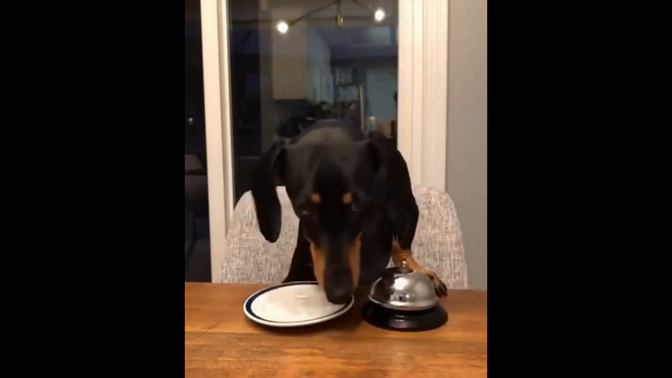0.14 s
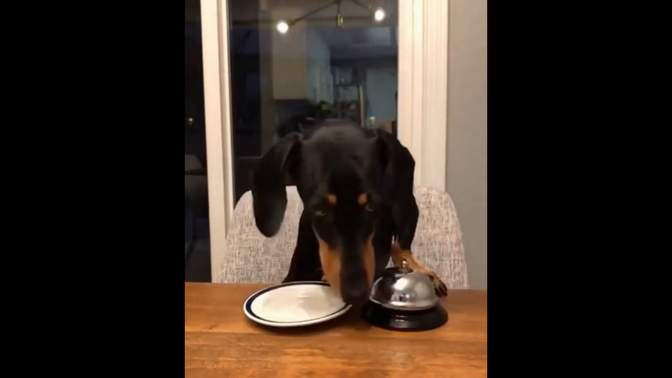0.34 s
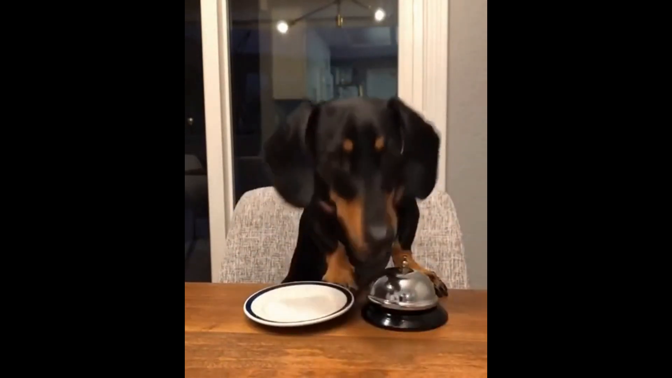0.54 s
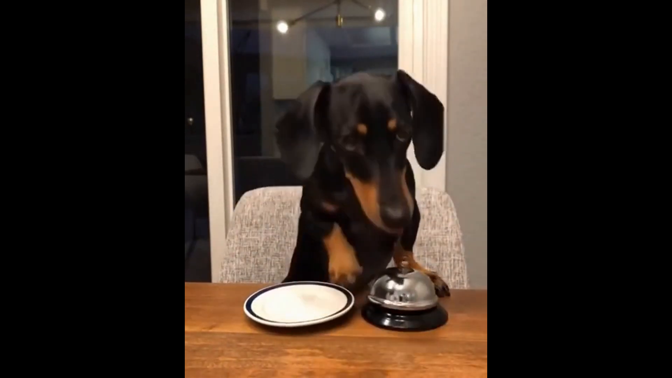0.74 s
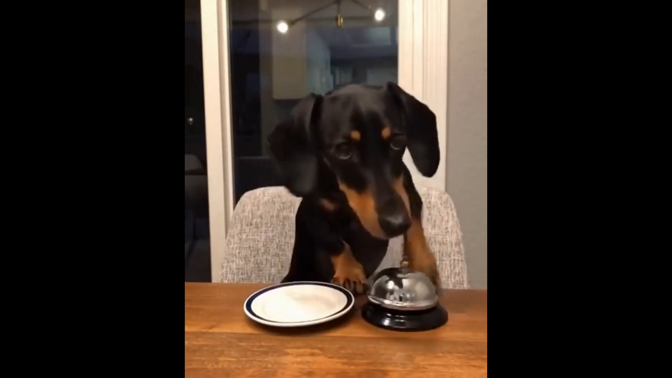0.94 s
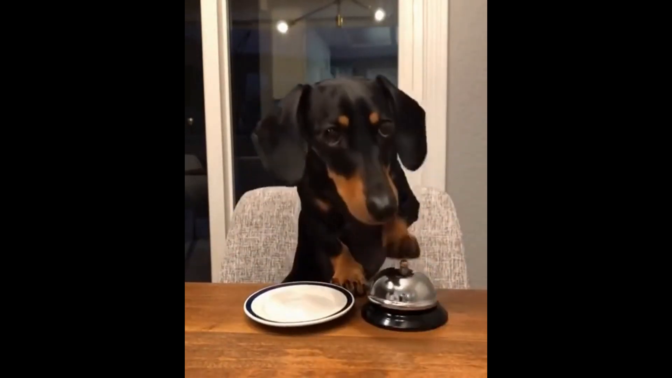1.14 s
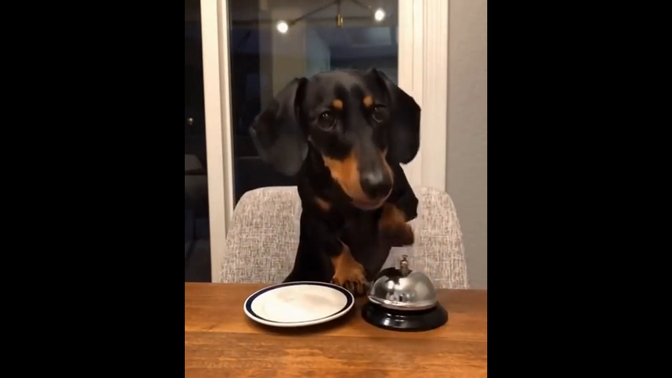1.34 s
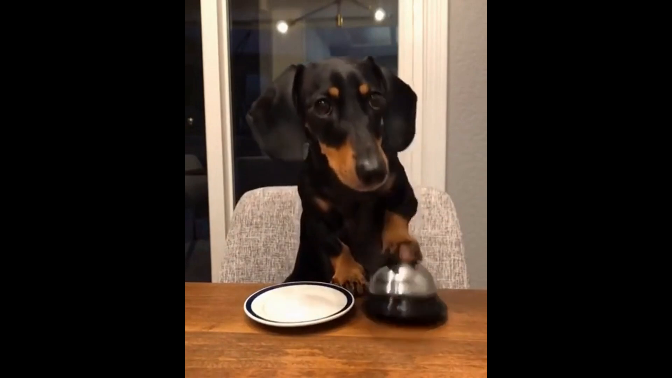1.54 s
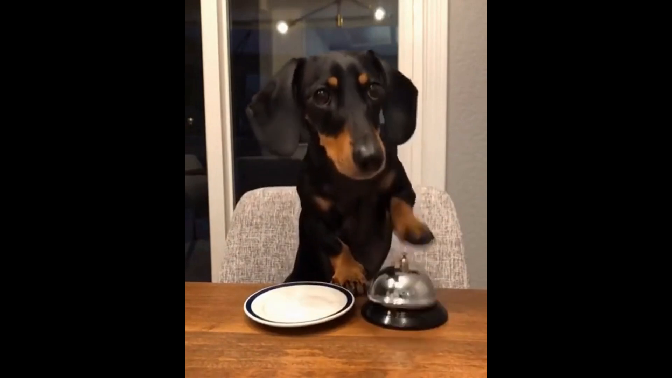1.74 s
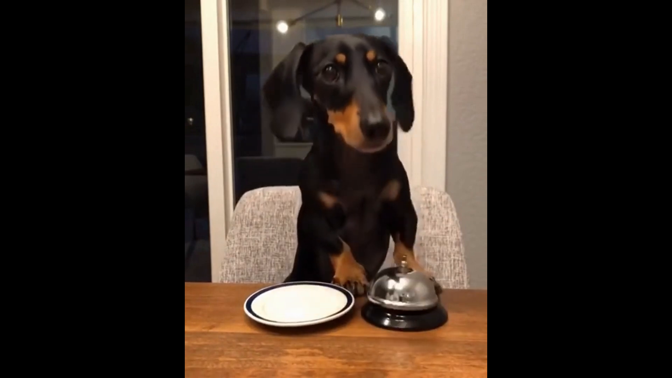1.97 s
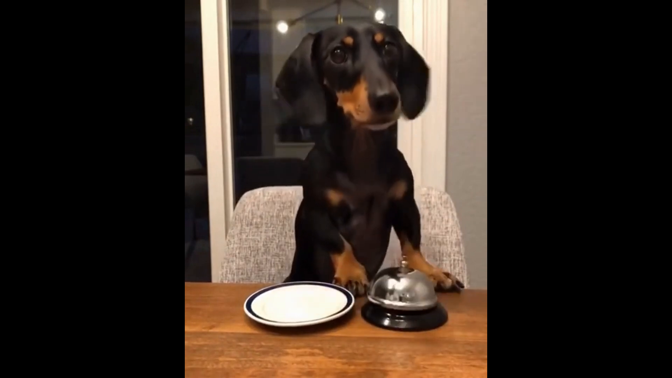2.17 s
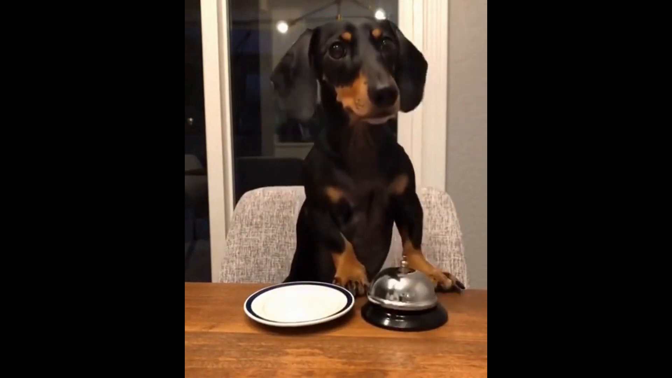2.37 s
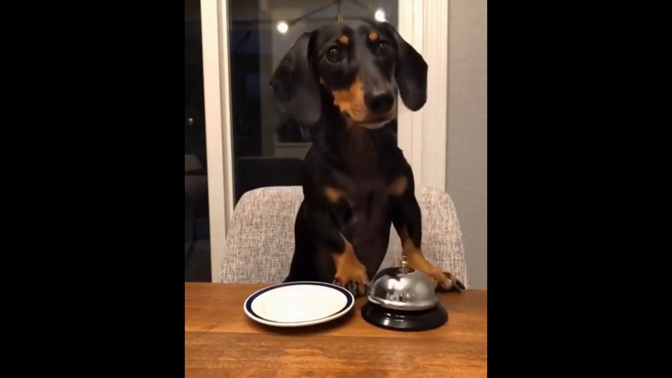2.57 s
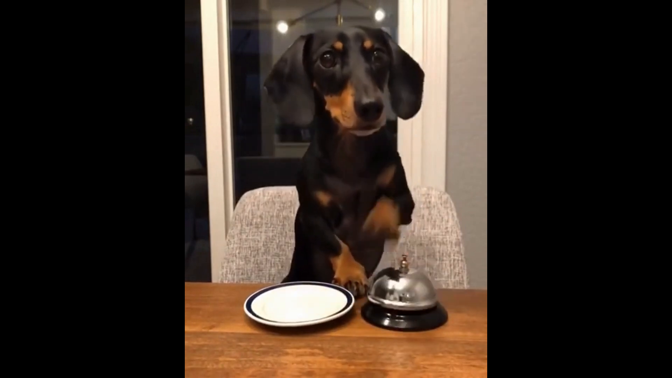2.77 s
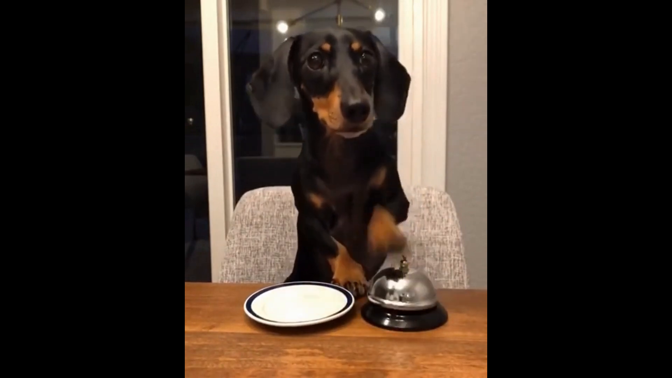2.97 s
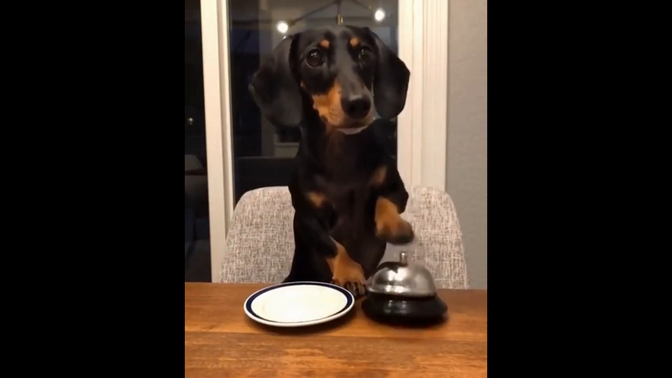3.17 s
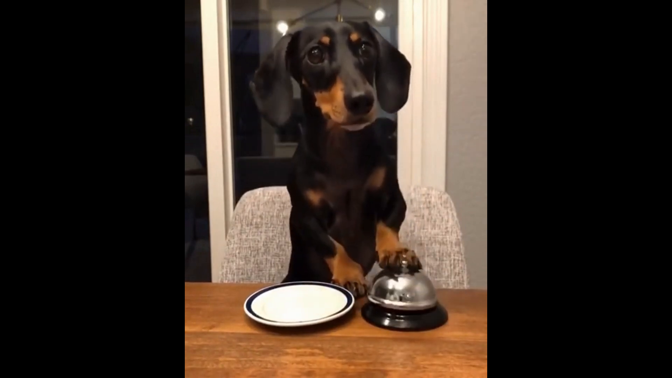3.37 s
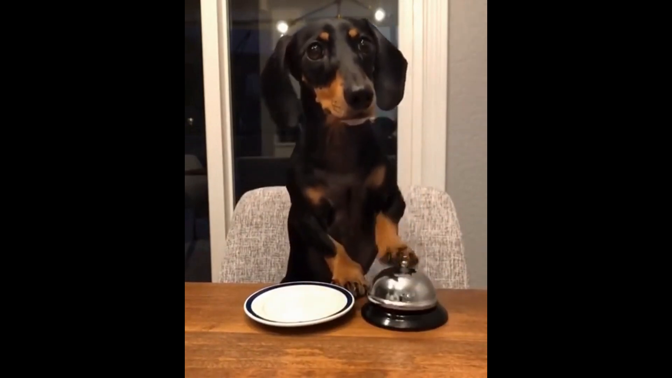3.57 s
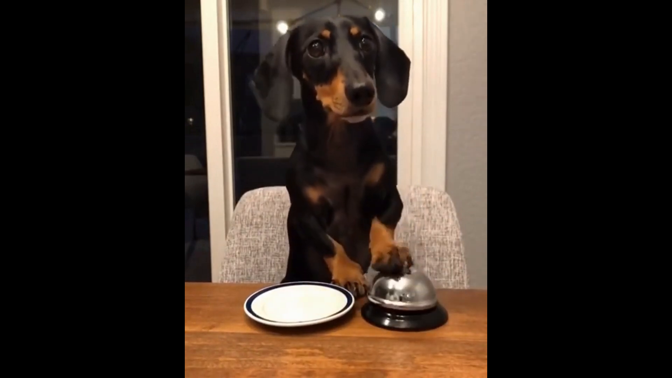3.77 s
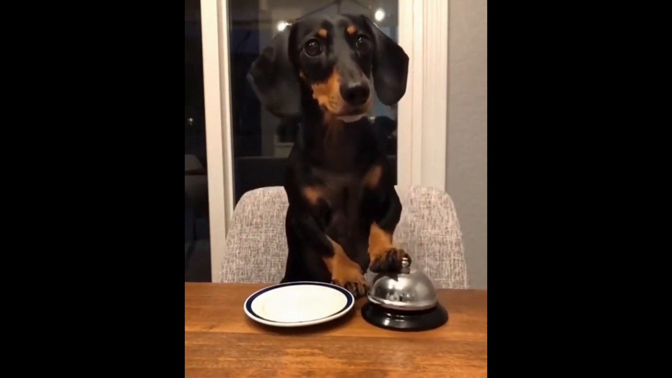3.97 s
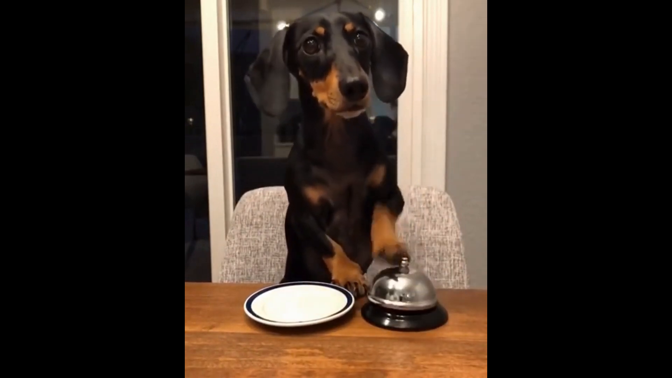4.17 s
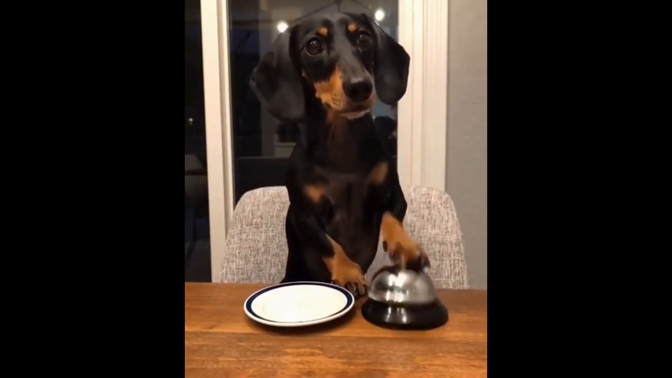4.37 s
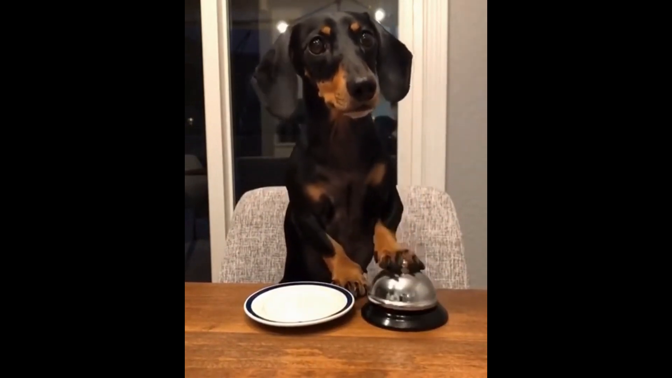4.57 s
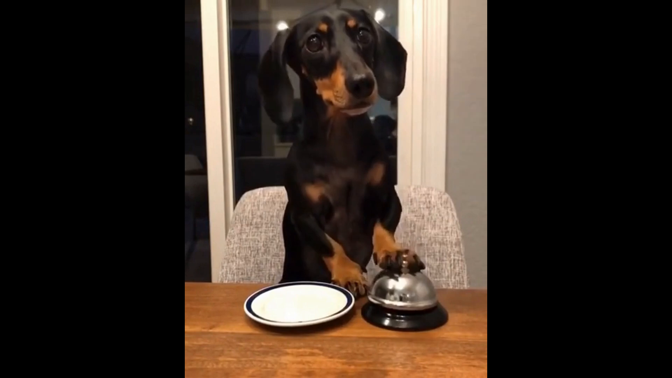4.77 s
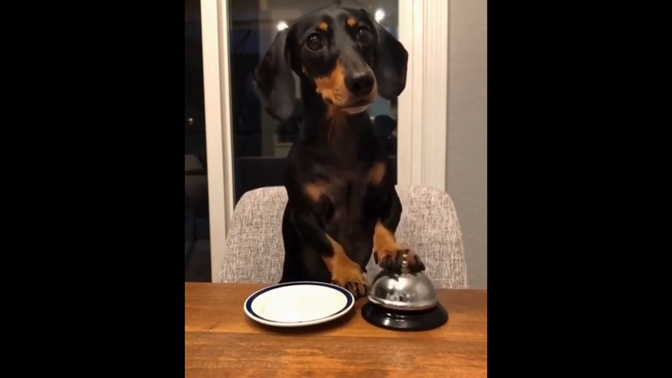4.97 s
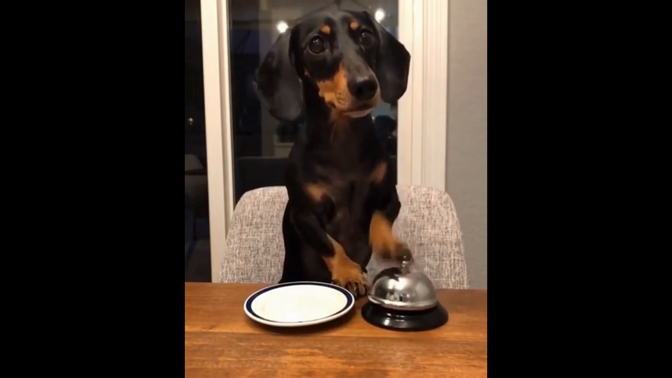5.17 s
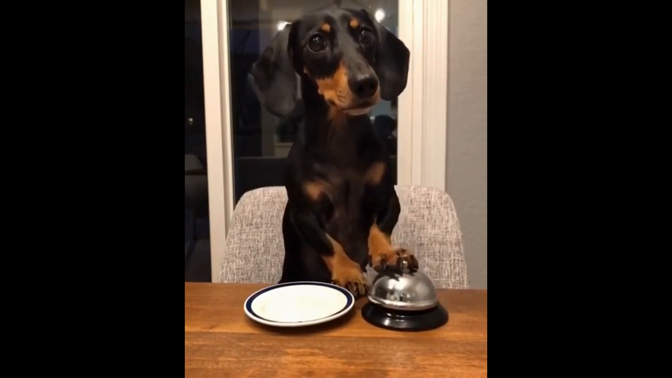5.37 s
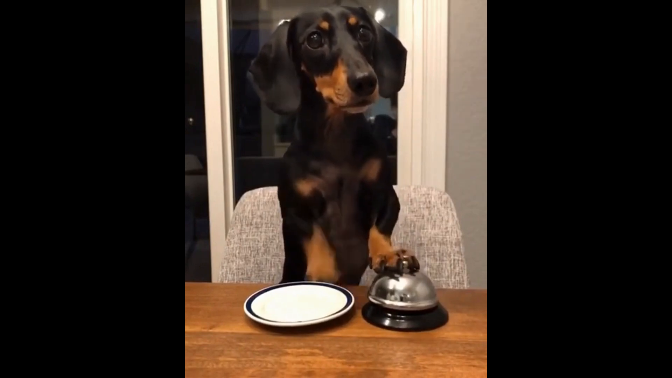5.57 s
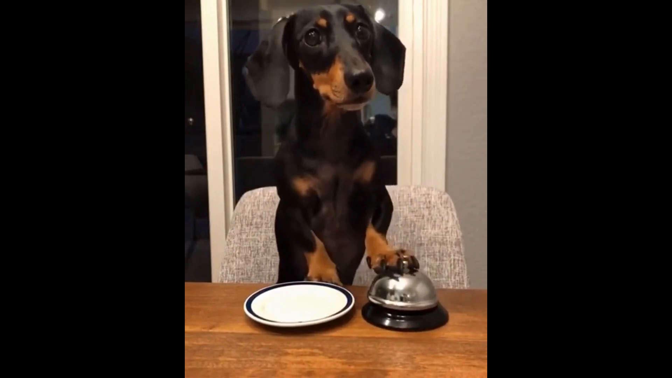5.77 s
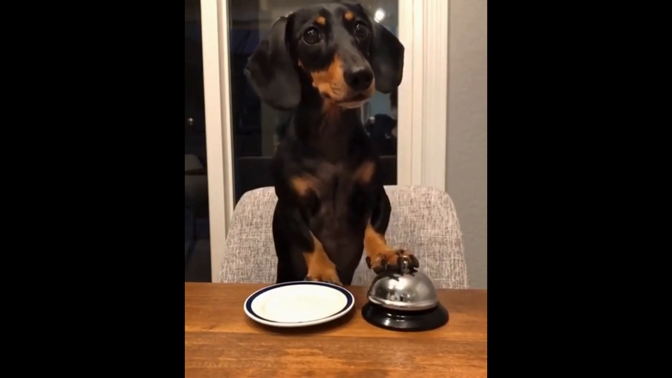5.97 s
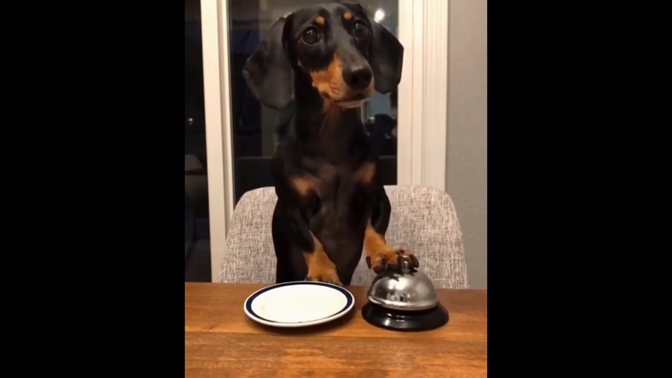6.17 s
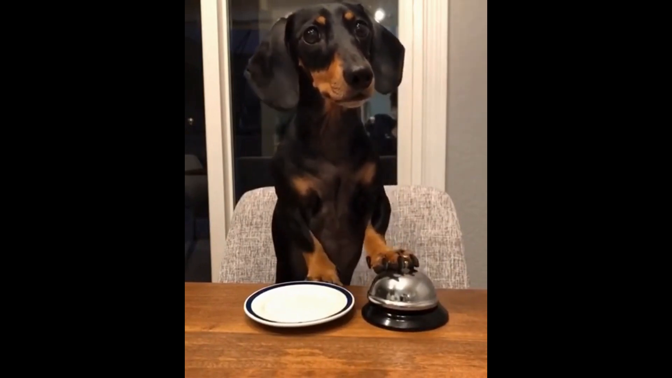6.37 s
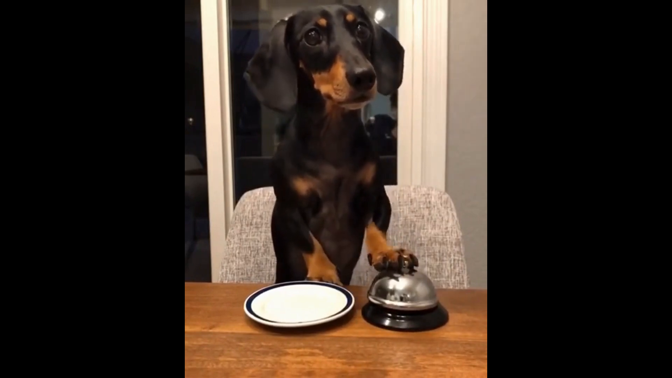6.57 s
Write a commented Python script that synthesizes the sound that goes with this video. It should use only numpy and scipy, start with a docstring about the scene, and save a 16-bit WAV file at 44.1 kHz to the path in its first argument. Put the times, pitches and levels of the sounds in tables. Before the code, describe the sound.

Soft licks and claw ticks, then a desk bell dings three times amid clacks and thumps on a wooden table in a quiet room.

```python
"""Dog at a desk bell

A quiet room, one mono microphone close to a steel desk bell on a wooden table. A dog licks a plate,
then paws the bell: the striker rings the dome, the paw damps it, slips off and thumps the table.
Claws tick, fur scuffs and the base rattles. A limiter holds the loud blows down."""
import sys
import numpy as np
from scipy import signal
from scipy.fft import rfft, irfft, next_fast_len
from scipy.io import wavfile
from scipy.ndimage import uniform_filter1d

SR = 44100
rng = np.random.default_rng(int(sys.argv[2]) if len(sys.argv) > 2 else 0)


def output_pcm(signal):
    """Save a mono or channel-first signal as 16-bit PCM at the path in sys.argv[1].

    Samples are clipped to [-1, 1] before scaling.
    """
    pcm = np.clip(np.atleast_2d(signal).T, -1, 1) * 32767
    wavfile.write(sys.argv[1], SR, np.round(pcm).astype(np.int16))


N = 291942
T = np.arange(N) / SR

# colour of the room's air: (frequency [Hz], level [dB])
AIR_COLOUR = [(13, -43), (22, -13), (79, -14), (135, -11), (190, 1), (324, -16), (435, -9), (552, -16),
              (702, -9), (1130, -25), (1560, -27), (1740, -23), (3200, -37), (11200, -51), (12800, -67),
              (16600, -97), (22000, -120)]
# the air at the microphone: (time [s], level [dB])
AIR_CURVE = [(0, -50), (.8, -52), (2.5, -54), (6.62, -53)]
# wavering hums: (frequency [Hz], width [Hz], level [dB])
ROOM_HUMS = [(42, 10, -69), (118, 10, -70), (193, 5, -59), (250, 12, -66), (432, 15, -68), (710, 30, -68)]
# colour of the reflections: (frequency [Hz], level [dB])
ROOM_COLOUR = [(20, -36), (60, -16), (150, -10), (250, -6), (400, -10), (700, -15), (1300, -7), (1900, -10),
               (2800, -10), (5000, -15), (6500, -15), (8500, -23), (12300, -19), (20000, -40)]
# decay of the reflections: (frequency [Hz], t60 [s])
ROOM_DECAY = [(60, .45), (250, .45), (700, .65), (1500, .62), (3500, .52), (7000, .42), (12000, .3)]

# deep rumble: (loudest at [s], level [dB], 20 dB rise [s], 20 dB fall [s])
RUMBLE_SWELLS = [(.8, -49, .15, .3), (1.42, -51, .2, .4), (3.0, -48, .18, .3), (4.3, -51, .22, .3)]
# scuffs, except at 3.116 and 4.372 s, where a short noise swell rises just before a slam:
# (loudest at [s], level [dB], 20 dB rise [s], 20 dB fall [s])
NOISE_SWELLS = [(.106, -47, .08, .05), (.178, -52, .05, .09), (.37, -64, .12, .07), (.584, -66, .25, .3),
                (.706, -50, .012, .11), (.94, -67, .1, .2), (1.176, -45, .045, .11),
                (1.306, -45, .015, .025), (1.402, -44, .03, .05), (1.594, -52, .17, .005),
                (2.826, -70, .11, .08), (2.908, -45, .022, .03), (2.922, -35, .008, .003),
                (3.116, -21, .025, .003), (3.62, -26, .02, .015), (3.655, -38, .04, .08),
                (4.198, -38, .025, .08), (4.26, -39, .08, .06), (4.372, -26, .03, .003),
                (5.082, -50, .07, .11), (5.24, -68, .1, .25), (6.478, -63, .01, .4), (6.604, -54, .03, .08)]
# colour of that noise: (frequency [Hz], level [dB])
NOISE_COLOUR = [(300, -20), (700, -8), (1300, -2), (1800, -1.5), (2350, -6), (3500, -5), (4650, -8),
                (5900, -13), (7600, -10), (9200, -8), (11800, -12), (14000, -30)]
# flares of high hiss: (loudest at [s], level [dB], 20 dB rise [s], 20 dB fall [s])
HISS_SWELLS = [(3.265, -23, .07, .1), (3.44, -57, .1, .12)]
# tongue on the plate: (time [s], level [dB], pitch [Hz])
TONGUE_LICKS = [(0.0513, -31, 1460), (0.0697, -23, 1180), (0.0797, -23, 1130), (0.0974, -27, 1490),
                (0.1054, -26, 1020), (0.1456, -37, 1130), (0.181, -31, 1460), (0.2144, -41, 1310),
                (0.3331, -34, 1460), (0.5297, -40, 1500), (0.5796, -41, 1380)]
# claw ticks: (time [s], level [dB], pitch [Hz])
CLAW_TICKS = [(.043, -40, 3500), (.102, -32, 3400), (.216, -40, 3200), (.385, -50, 3400),
              (.7154, -31, 1500), (1.1697, -30, 8940), (1.18, -36, 4700), (1.1962, -34, 1300),
              (1.3024, -33, 6970), (1.32, -42, 3400), (1.3992, -31, 2700), (1.4, -34, 7800),
              (1.41, -33, 3700), (1.5135, -41, 2910), (1.5728, -32, 2740), (2.908, -32, 4300),
              (4.1924, -32, 1400), (5.085, -36, 4500), (5.4335, -35, 6000), (5.524, -41, 1800),
              (6.4787, -42, 5500), (6.5435, -47, 4460), (6.6044, -35, 1490)]
TICK_CYCLES, TICK_MIN_T60_S, TICK_SPREAD_OCT = 13, .012, .5
# a small metal clink: (time [s], level [dB])
CLINK_HIT = [(5.4335, -34)]
# its modes: (frequency [Hz], level [dB], t60 [s])
METAL_MODES = [(2256, -25, .3), (4807, -19.5, .65), (4883, -6, .11), (4960, -12, .12), (5545, -19, .3),
               (5642, -18, .3), (7585, -18, .2), (7854, -11, .22), (7892, -12, .25), (8382, -6, .08),
               (8839, -16, .25), (11010, -16, .22), (11300, -13, .1), (11590, -15, .14)]

# table top modes: (frequency [Hz], level [dB], t60 [s])
WOOD_MODES = [(43, -27.5, 1.1), (80, -20, .3), (117, -10, .22), (155, -1.5, .19), (195, -12, .2),
              (236, -8, .36), (300, -2.5, .27), (366, -17, .35), (460, -12, .33), (495, -18, .3),
              (630, -23, .3), (797, -17, .28)]
PUSH_S, DEEP_HZ, SPOT_DB = .012, 200, 2.5
# hard modes of the bell base: (frequency [Hz], level [dB], t60 [s])
BASE_MODES = [(1330, 2.5, .018), (2800, .1, .015), (3700, -9, .012), (4700, -8, .012), (6100, -5, .012),
              (8700, -11, .01), (11300, -14, .01), (12700, -5, .02)]
RATTLE_PER_S, RATTLE_S, RATTLE_DB = 150, .04, -8.5
# soft paw steps: (time [s], crack [dB], wood [dB], room send [dB], deepest modes [dB])
PAW_STEPS = [(.7053, -33, -40, -25, 6), (1.165, -48, -42, -17, -6), (2.725, -58, -39, -17, -4),
             (5.0894, -45, -34, -17, -10), (5.5223, -45, -43, -18, -8)]
# the paw slams the base down: (time [s], crack [dB], wood [dB], bounce after [s], second after [s])
BASE_SLAMS = [(1.6057, -8, -9, .0474, .0608), (3.1203, -9, -11, .0319, .0471),
              (4.376, -9.5, -11.5, .025, .045)]
# the plunger bottoms out: (time [s], crack [dB], wood [dB], springs back after [s])
PLUNGER_HITS = [(2.9262, -23, -31, .0332), (3.6172, -25, -34, .0414), (4.2044, -26, -36, .0394)]

# the paw's weight near the dome: (time [s], damping [dB/s])
PAW_LEAN = [(0, .1), (2.88, .1), (2.93, 10), (4.0, 11), (4.5, 19), (5.0, 21), (5.4, 28), (5.44, 110),
            (6.62, 110)]
# the paw closes on the dome: (start [s], length [s], damping [dB/s])
PAW_GRIPS = [(1.39, .24, 55), (3.11, .05, 30), (3.183, .016, 1300)]
PRESS_S, PRESS_DB_S = .05, 45
# dome modes, close twins beat: (frequency [Hz], free t60 [s], share of paw damping, starting sign,
# share of twin balance, struck [dB], jolted [dB])
DOME_MODES = [(940.6, 15, 2.8, -1, .3, -31, -43), (943.8, 15, 2.8, 1, 0, -36, -51),
              (2484.8, 11, 1.1, 1, 0, -24, -33), (4584.3, 4.5, .55, -1, -1.8, -44, -59),
              (4598.2, 4.5, .95, 1, 0, -19, -55), (7196.3, 1.7, 1.1, -1, 1.1, -20, -27),
              (7217.9, 1.5, .8, 1, 0, -1.5, -26), (9230, .25, 1.1, 1, 0, -36, -50),
              (10163.8, .6, 2.1, 1, 0, -6, -18), (10800, .3, 2.1, 1, 0, -29, -50),
              (11620, .15, 1.1, 1, 0, -34, -50)]
# striker blows, the first already ringing at the start:
# (time [s], level [dB], hardness [dB/octave], twin balance [dB], top modes [dB])
STRIKER_BLOWS = [(-.758, -16, -22, 0.1, .1), (2.928, -3, -.5, 1.5, .1), (3.619, -1.5, .4, 0.1, 1.5),
                 (4.205, .3, -1.2, -7, -1)]
# the table's shock shakes the dome: columns as for the striker blows
DOME_JOLTS = [(1.655, 0.1, 0.1, 0.1, .1), (3.2, 7.5, .1, -7, -30), (4.42, 7, -12, 0.1, .1)]
HARD_FROM_HZ, TOP_HZ, DOME_SILENT_S = 2500, 9000, 6
DIRECT_SHARE, BUILD_UP_S, STEP_SHARE, STEP_S = .5, .015, .35, .048

CEILING_DB, RELEASE_DB_S, ATTACK_S, STOPBAND_HZ = -1.5, 150, .003, 13350


def amp(db):
    """Decibels to gain."""
    return 10 ** (np.asarray(db) / 20)


def rms_one(x):
    """Scale to rms 1."""
    return x / np.sqrt(np.mean(x ** 2) + 1e-20)


def at_hz(points, hz):
    """Read a table on a log-frequency axis."""
    freqs, values = np.transpose(points)
    return np.interp(np.log(hz), np.log(freqs), values)


def bandpass(x, edges_hz, order=2):
    """Keep the band between two edges."""
    return signal.sosfilt(signal.butter(order, edges_hz, "band", fs=SR, output="sos"), x)


def coloured(spectrum):
    """Noise with the given spectrum, rms 1."""
    size = next_fast_len(N)
    hz = np.maximum(np.arange(size // 2 + 1) * SR / size, 1)
    shaped = rfft(rng.standard_normal(size)) * amp(at_hz(spectrum, hz))
    return rms_one(irfft(shaped, size)[:N])


def swells(rows):
    """Gain of separate swells, each rising and falling straight in dB."""
    out = np.zeros(N)
    for s, db, rise, fall in rows:
        near = slice(max(int((s - 3 * rise) * SR), 0), int((s + 3 * fall) * SR))
        age = T[near] - s
        out[near] += amp(db - 20 * np.maximum(age / fall, -age / rise))
    return out


def clicks(times, db):
    """Impulses at the given times and levels."""
    out = np.full(N, 1e-18)
    np.add.at(out, np.minimum((np.asarray(times) * SR).astype(int), N - 1), amp(db))
    return out


def ring(x, hz, t60):
    """One mode: a unit click starts a dying sine of height 1."""
    r, w = 1000 ** (-1 / (t60 * SR)), 2 * np.pi * hz / SR
    return signal.lfilter([0, np.sin(w)], [1, -2 * r * np.cos(w), r * r], x)


def room_tone():
    """The quiet room: broad air noise and narrow bands that waver as hums."""
    out = amp(np.interp(T, *np.transpose(AIR_CURVE))) * coloured(AIR_COLOUR)
    for hz, width_hz, db in ROOM_HUMS:
        t60 = np.log(1000) / (np.pi * width_hz)
        out += amp(db) * rms_one(ring(rng.standard_normal(N), hz, t60))
    return out


def reflections(x):
    """The room answers with dense reflections, each half octave dying at its own rate."""
    age, tail = T[:SR], np.zeros(SR)
    edges = 20 * 2 ** np.arange(0, 10, .5)
    white = rng.standard_normal((2, SR))
    for k, (low, high) in enumerate(zip(edges, edges[1:])):
        hz = np.sqrt(low * high)
        band = amp(at_hz(ROOM_COLOUR, hz)) * bandpass(white[k % 2], [low, high])
        tail += band * 1000 ** (-age / at_hz(ROOM_DECAY, hz))
    tail *= 1 - np.exp(-age / .01)
    early_rms = np.sqrt(np.mean(tail[:SR // 10] ** 2))
    return signal.fftconvolve(x, tail / early_rms)[:N]


def rumble():
    """Deep noise swells, perhaps the dog shifting its weight."""
    return swells(RUMBLE_SWELLS) * rms_one(bandpass(rng.standard_normal(N), (26, 55)))


def scuffs_and_swells():
    """Grainy noise: close scuffs, and a short swell rising just before each of the last two slams."""
    grain_db = 4.5 * rms_one(uniform_filter1d(rng.standard_normal(N), size=60))
    return swells(NOISE_SWELLS) * rms_one(amp(grain_db) * coloured(NOISE_COLOUR))


def hiss():
    """A narrow hiss flares in the top treble."""
    return swells(HISS_SWELLS) * rms_one(bandpass(rng.standard_normal(N), (9800, 10900), order=6))


def licks_and_ticks():
    """Each touch of tongue or claw rings briefly at its own pitch and three chance ones."""
    out, length = np.zeros(N + SR), SR // 20
    impulse = signal.unit_impulse(length)
    for s, db, hz in TONGUE_LICKS + CLAW_TICKS:
        side_hz = np.clip(hz * 2 ** (TICK_SPREAD_OCT * rng.standard_normal(3)), 500, 11500)
        modes = [(hz, 1)] + [(f, amp(-9)) for f in side_hz]
        tick = sum(gain * ring(impulse, f, max(TICK_CYCLES / f, TICK_MIN_T60_S)) for f, gain in modes)
        edge = amp(-22) * rng.standard_normal(length) * np.exp(-T[:length] / .004)
        start = int(s * SR)
        out[start:start + length] += amp(db) * (tick + edge)
    return out[:N]


def clink():
    """A brief buzzing contact sets off short, bright metal modes."""
    s, db = CLINK_HIT[0]
    buzz = rng.standard_normal(SR) * np.exp(-T[:SR] / .009)
    buzz *= amp(db) / np.linalg.norm(buzz)
    ringing = sum(amp(mode_db) * ring(buzz + 1e-18, hz, t60) for hz, mode_db, t60 in METAL_MODES)
    out, start = np.zeros(N), int(s * SR)
    out[start:start + SR] = amp(15) * buzz + ringing
    return out


def knocks():
    """Every contact with the table, in the columns of PAW_STEPS."""
    rows = list(PAW_STEPS)
    for s, crack, wood, first, second in BASE_SLAMS:
        rows += [(s, crack, wood, -15, 1.1),
                 (s + first, crack - 5, wood - 14, -18, 1.1),
                 (s + second, crack - 6, wood - 19, -18, 1.1)]
    for s, crack, wood, back in PLUNGER_HITS:
        rows += [(s, crack, wood, -19, -7),
                 (s + back, crack - 8, wood - 3, -17, -7)]
    return np.transpose(rows)


def rattle():
    """The bell base chatters after each knock: small random contacts, each with its own mix of modes."""
    s, crack_db = knocks()[:2]
    shake = signal.lfilter([1], [1, -np.exp(-1 / (RATTLE_S * SR))], clicks(s, crack_db + RATTLE_DB))
    contacts = shake * (rng.random(N) < RATTLE_PER_S / SR)
    return sum(amp(db) * ring(contacts * rng.standard_normal(N) + 1e-18, hz, t60)
               for hz, db, t60 in BASE_MODES)


def thumps():
    """The base cracks and the table top swings; returns the close sound and the room send."""
    s, crack_db, wood_db, room_db, deep_db = knocks()
    hits = clicks(s, crack_db)
    out = sum((-1) ** k * amp(db) * ring(hits, hz, t60) for k, (hz, db, t60) in enumerate(BASE_MODES))
    slow = np.exp(-1 / (PUSH_S * SR))   # the top takes a moment to start swinging
    spot_db = SPOT_DB * rng.standard_normal((len(s), len(WOOD_MODES)))   # each knock lands elsewhere
    for k, (hz, db, t60) in enumerate(WOOD_MODES):
        drive = clicks(s, wood_db + deep_db * (hz < DEEP_HZ) + spot_db[:, k])
        push = signal.lfilter([1 - slow], [1, -slow], drive)
        envelope = signal.lfilter([1], [1, -1000 ** (-1 / (t60 * SR))], push)
        out += amp(db) * envelope * np.sin(2 * np.pi * (hz * T + rng.random()))
    return out, clicks(s, crack_db + room_db) * rng.choice([-1, 1], N)


def plunger_ping():
    """One high mode rings as the plunger springs back."""
    s, crack_db, _, back = np.transpose(PLUNGER_HITS)
    return ring(clicks(s + back, crack_db + 3.5), hz=10800, t60=.25)


def paw_damping():
    """Loss in dB/s as the paw leans, grips and lands on the dome just before each striker blow."""
    out = np.interp(T, *np.transpose(PAW_LEAN))
    landings = [(row[0] - PRESS_S, PRESS_S, PRESS_DB_S) for row in STRIKER_BLOWS]
    for s, length, db_s in PAW_GRIPS + landings:
        out += db_s * ((T > s) & (T < s + length))
    return out


def bell():
    """Each blow rings all dome modes; the paw damps them, a strike or the first jolt stills the rest."""
    paw_db = np.cumsum(paw_damping()) / SR
    blows = [(row, False) for row in STRIKER_BLOWS] + [(row, True) for row in DOME_JOLTS]
    stops = [row[0] for row in STRIKER_BLOWS] + [DOME_JOLTS[0][0], DOME_SILENT_S]
    out = np.zeros(N)
    for (s, db, hard_db, twin_db, top_db), jolt in blows:
        start = max(int(s * SR), 0)
        stop = int(min(t for t in stops if t > s) * SR)
        age = T[start:stop] - s
        swell = 1 - (1 - DIRECT_SHARE) * np.exp(-age / BUILD_UP_S)   # reflections arrive and add up
        # the ring steps up in level about 50 ms after each blow
        swell *= 1 - STEP_SHARE / (1 + np.exp((np.minimum(age, 1) - STEP_S) / .006))
        for hz, t60, paw_share, sign, twin_share, struck_db, jolted_db in DOME_MODES:
            start_db = db + (jolted_db if jolt else struck_db)
            start_db += twin_db * twin_share + top_db * (hz > TOP_HZ)
            start_db += hard_db * max(np.log2(hz / HARD_FROM_HZ), 0)
            loss_db = 60 * age / t60 + paw_share * (paw_db[start:stop] - paw_db[start])
            out[start:stop] += sign * swell * amp(start_db - loss_db) * np.sin(2 * np.pi * hz * age)
    return out


def scene():
    """Bell and dog up close, the room behind them; one microphone on both channels."""
    wood, room_send = thumps()
    ticks = licks_and_ticks()
    metal = clink()
    room = reflections(room_send + amp(-48) * ticks + amp(-33) * metal)
    close = wood + rattle() + ticks + scuffs_and_swells() + hiss() + rumble()
    mono = room_tone() + room + close + metal + plunger_ping() + bell()
    return np.array([mono, mono])


def record(dry):
    """The recorder: a peak limiter with a steady release, a hard clip, then a steep treble cut."""
    over_db = np.maximum(20 * np.log10(np.abs(dry[0]) + 1e-9) - CEILING_DB, 0)
    release_db = RELEASE_DB_S * T
    held_db = np.maximum.accumulate(over_db + release_db) - release_db
    attack = np.exp(-1 / (ATTACK_S * SR))
    limited = dry * amp(-signal.lfilter([1 - attack], [1, -attack], held_db))
    treble_cut = signal.cheby2(14, 80, STOPBAND_HZ, fs=SR, output="sos")
    return signal.sosfilt(treble_cut, np.clip(limited, -.9, .9))


dry = scene()
out = record(dry)
output_pcm(out)
```